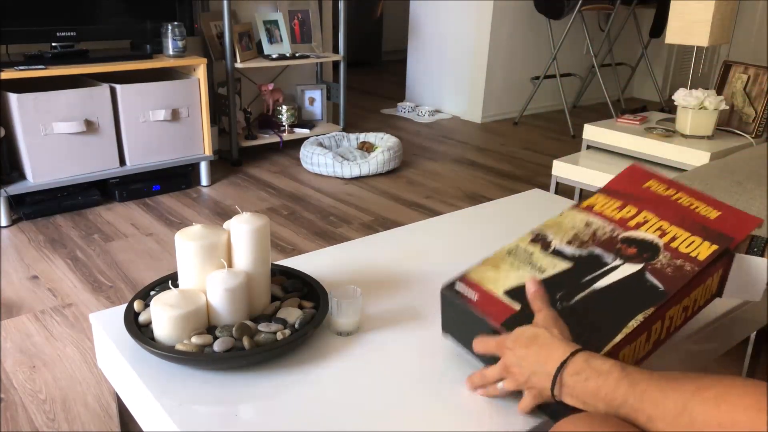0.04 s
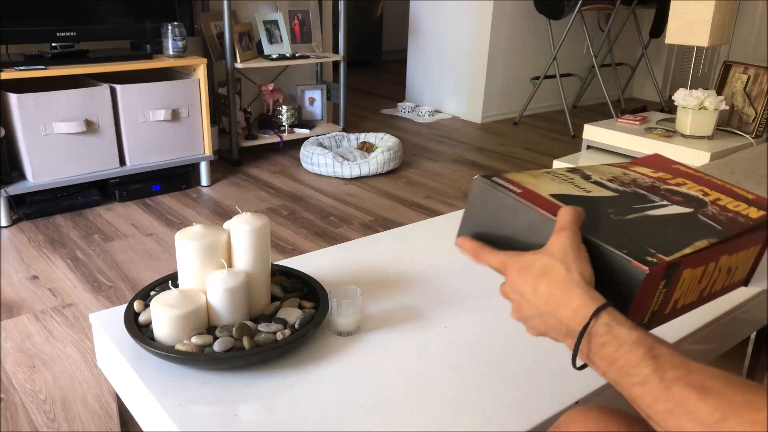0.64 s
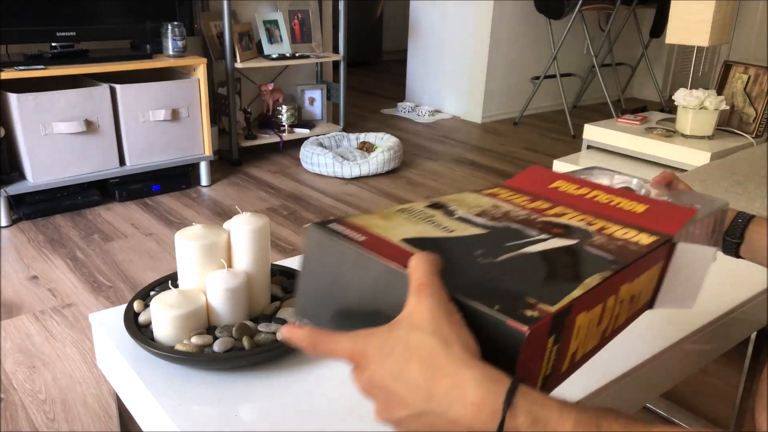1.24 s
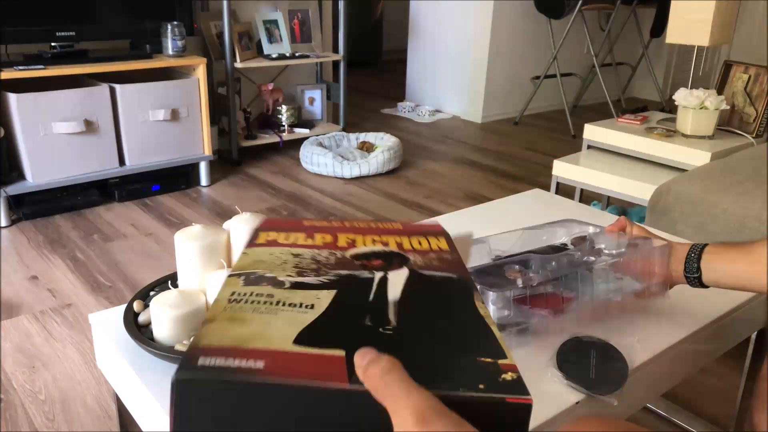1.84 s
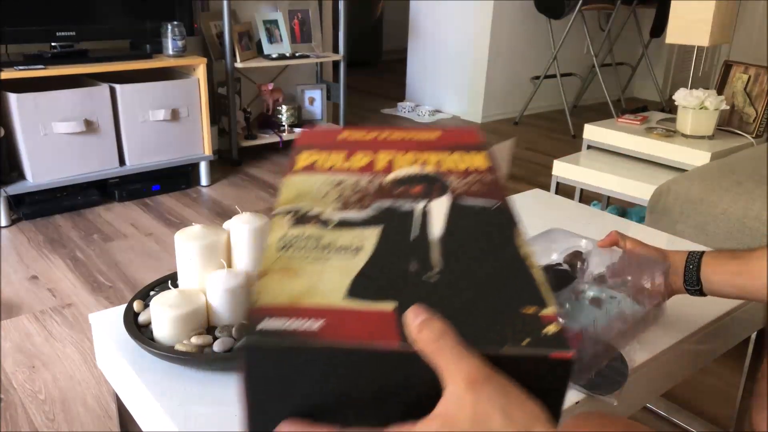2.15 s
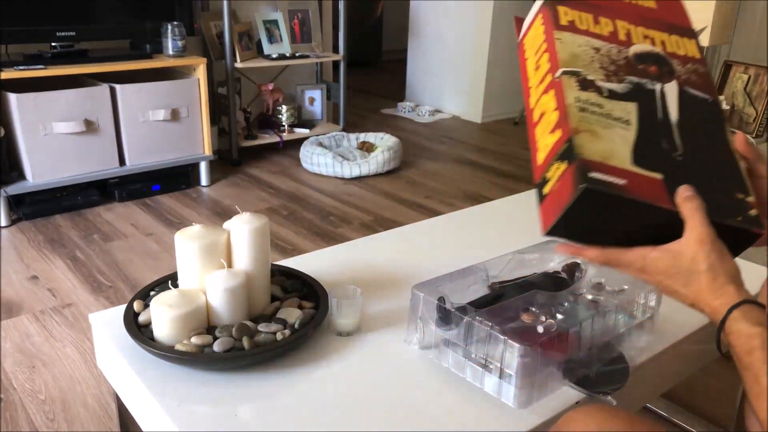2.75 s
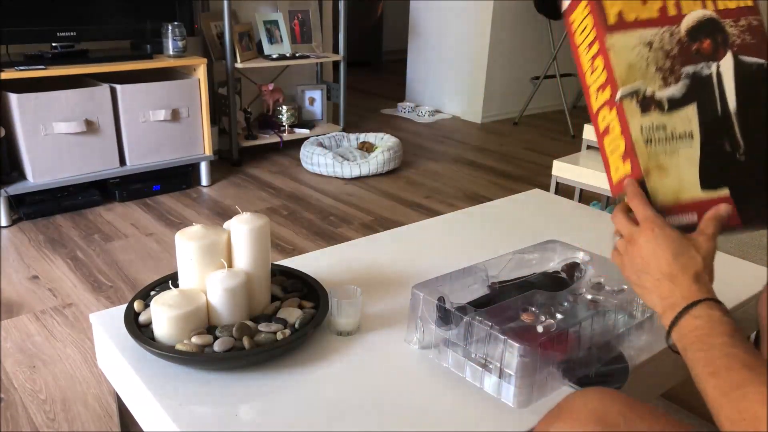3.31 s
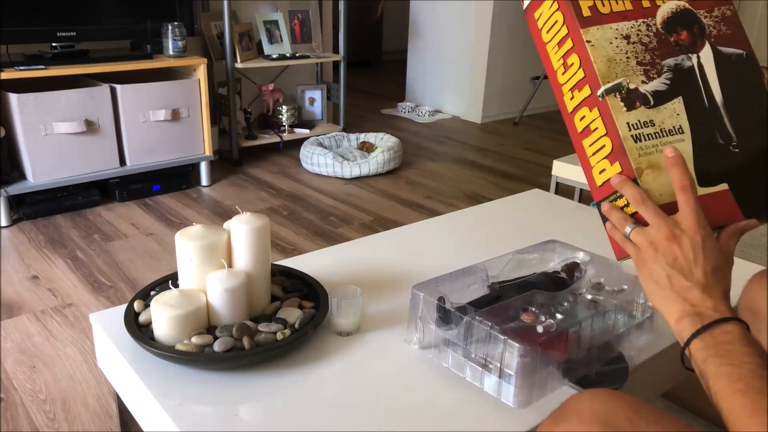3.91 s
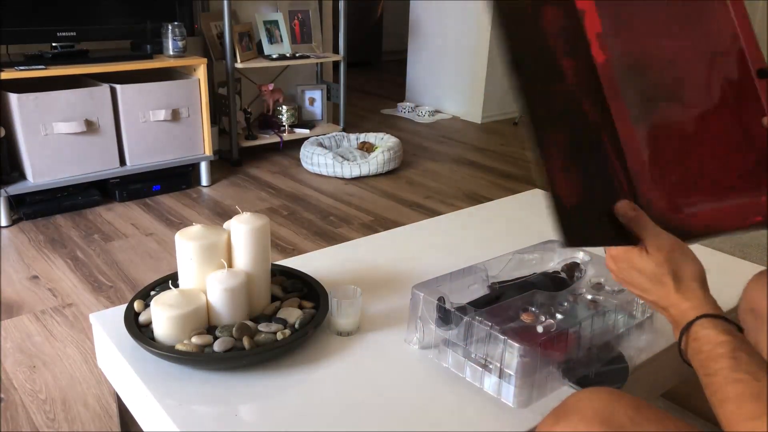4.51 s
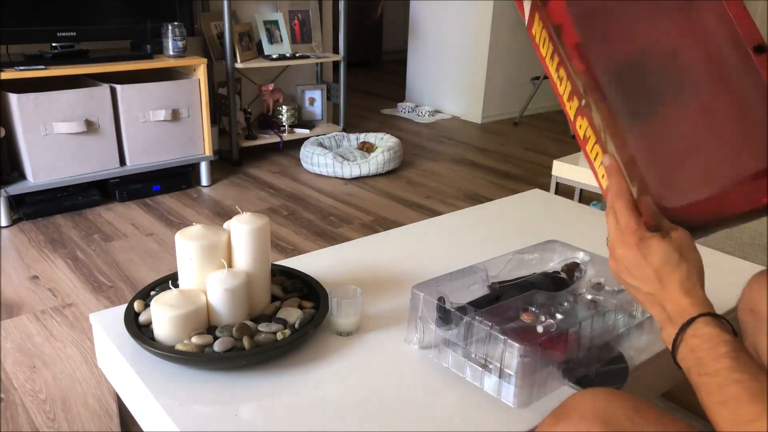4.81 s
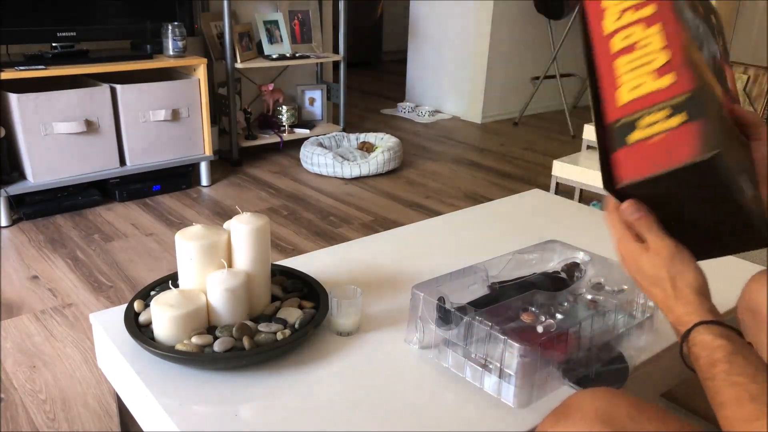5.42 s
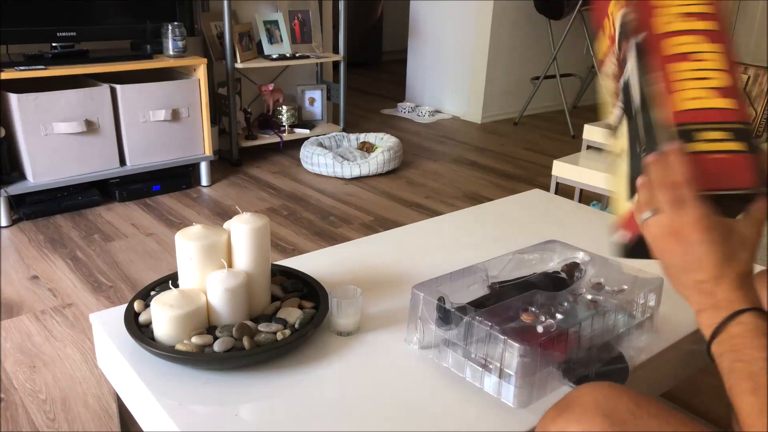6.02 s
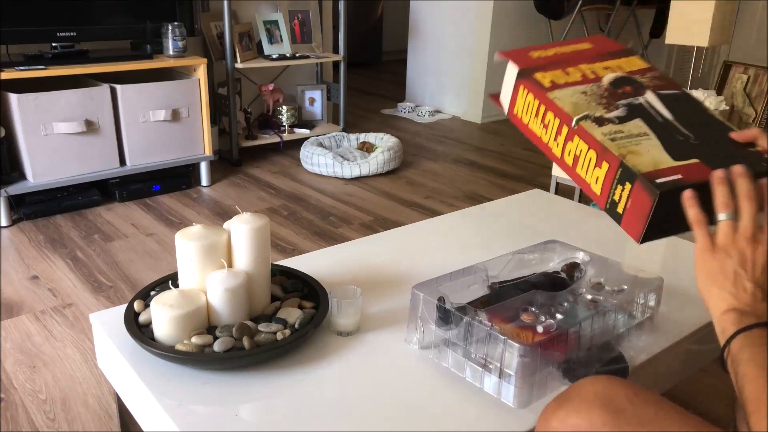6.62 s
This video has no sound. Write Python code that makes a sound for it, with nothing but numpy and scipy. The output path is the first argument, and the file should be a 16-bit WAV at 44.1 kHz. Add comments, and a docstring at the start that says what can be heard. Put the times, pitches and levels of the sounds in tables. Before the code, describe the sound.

Plastic slides and clacks against cardboard, a dropped plastic disc rattles, and a box flap pops open with sharp snaps in a quiet room.

```python
"""A living room: a plastic tray scrapes and clacks out of a cardboard box, and a hard plastic disc drops
out, rings and rocks on the table. The tray is set down, a flap snaps open in jerks, and hands turn
the box over, knocking and rubbing on it. Blows are made of fading tones (modes) and short bursts of
noise; rubbing is uneven noise. The room rings after every blow, and an appliance hums faintly."""
import sys
import numpy as np
from scipy import signal
from scipy.fft import rfft, irfft, next_fast_len
from scipy.io import wavfile
from scipy.ndimage import map_coordinates

SR = 44100
rng = np.random.default_rng(int(sys.argv[2]) if len(sys.argv) > 2 else 0)


def file_out(sig):
    """Save sig as 16-bit WAV at sys.argv[1]."""
    # one column per channel
    cols = np.atleast_2d(sig).T
    # limit, then scale
    lim = np.clip(cols, -1, 1)
    pcm = np.round(lim * 32767).astype(np.int16)
    wavfile.write(sys.argv[1], SR, pcm)


N = 293420

# Levels in all tables are relative. t60 is the time a sound takes to fade by 60 dB.
# low tones of the table's frame: f/Hz, level/dB, t60/s
FRAME_MODES = [(105.1, 2.5, 0.23), (130, -6, 0.32)]
# jerks of the flap's tab as it leaves its slot: t/s, level/dB
TAB_SNAPS = [(3.962, -36), (4.1177, -26.5), (4.1234, -24), (4.145, -20.5), (4.1532, -22.5), (4.1622, -19.5),
             (4.204, -19.5), (4.2077, -16), (4.2427, -31), (4.2559, -12.5), (4.264, -13.5), (4.2687, -15.5)]
# spectra, which say how strong a noise is from low to high: f/Hz, level/dB
CLACK_SPECTRUM = [(400, -22.5), (750, 0.5), (1100, 1.5), (1450, -2), (1900, 0), (3000, -11), (5000, -26),
                  (12000, -41)]  # a blow on a thin panel
CLICK_SPECTRUM = [(1200, -12.5), (2400, -5), (3300, 5.5), (4200, -5), (6000, -2.5), (8500, -8),
                  (11000, -14.5), (16000, -15.5)]  # hard plastic striking
CARD_SPECTRUM = [(700, -25.5), (1700, -9.5), (2400, 3), (3400, 0.5), (4200, -4), (5400, 1), (8000, -3.5),
                 (11000, -11), (16000, -25)]  # a sharp tick on cardboard
HOLLOW_SPECTRUM = [(90, -25.5), (210, -2), (245, -2), (285, -3), (350, -0.5), (435, 0), (540, -6.5),
                   (657, -2.5), (790, -10), (1400, -9), (3000, -34.5)]  # the hollow body of the box
SKIN_SPECTRUM = [(800, -16), (1800, 0), (3200, 1.5), (4200, -3), (6500, -2.5), (9000, -3.5), (12000, -10),
                 (16000, -9.5)]  # skin brushing over card


def disc():
    """The disc lands flat, then rocks on its rim; each contact rings the disc, the table and the room."""
    contacts = [(1.4662, -20), (1.5425, -26), (1.579, -17), (1.613, -28), (1.6445, -21.5), (1.658, -25),
                (1.717, -23.5), (1.766, -24)]  # the disc hits the table: t/s, click level/dB
    disc_modes = [(566, 0, .2), (867, -5, .35), (1058, 1, .2), (1091, 0, .2), (1111, -3, .2),
                  (1162, -4, .18), (1298, -3, .2), (1400, -2, .25), (1598, -4, .18), (1678, -2, .15),
                  (1755, -7, .28), (2008, -9, .16), (2276, -8, .22), (2341, -5, .22), (2369, -9, .18),
                  (2720, -10, .16), (2945, -11, .18), (3061, -10, .14), (3230, -11, .16), (3505, -9, .14),
                  (4430, -14, .1), (4963, -15, .1), (5927, -15, .1)]  # tones of the disc: f/Hz, level/dB, t60/s
    top_modes = [(506, 0, .17), (470, -10, .07), (385, -18, .06), (260, -16, .07), (175, -22, .08)]  # tones of the table top: f/Hz, level/dB, t60/s
    rattle_spectrum = [(40, -60.5), (100, -35), (200, -16.5), (400, -12), (520, -0.5), (720, -9),
                       (1100, -8), (1900, -7.5), (2400, -7), (3300, -14), (4200, -18), (6500, -22),
                       (16000, -34.5)]  # noise of a contact: f/Hz, level/dB
    settle_s, damping_db_per_s = 1.592, 196  # from then on the table muffles each contact more
    shake_db_per_s = 29  # the frame shakes more as the rocking gets lower
    landing_s = contacts[0][0]
    out = np.zeros(N)
    for s, click_db in contacts:
        ring_db = -22 - damping_db_per_s * max(s - settle_s, 0)
        top_db = -15 if s == landing_s else ring_db - 13
        frame_db = -52 + shake_db_per_s * (s - landing_s)
        contact = np.zeros(N)
        add(contact, s, amp(ring_db) * ring(disc_modes, scatter_db=2, attack=.00037))
        add(contact, s, amp(ring_db + 5.5) * burst(rattle_spectrum, t60=.06))
        add(contact, s, amp(click_db) * burst(CLICK_SPECTRUM, t60=.026))
        add(contact, s, amp(top_db) * ring(top_modes, scatter_db=1.2, attack=.0008))
        add(contact, s, amp(frame_db) * ring(FRAME_MODES, scatter_db=1.2, attack=.01))
        out += in_room(contact, wet_db=-.5)
    return out


def tray():
    """The thin tray clacks against the box; its last blow lands on the table and shakes the frame."""
    blows = [(0.965, -25.5, -56, -55), (0.973, -28.5, -29.5, -31.5), (0.98, -29, -45, -49),
             (1.072, -21.5, -49, -30.5), (2.126, -36, -53, -24.5), (2.456, -38, -41.5, -41.5),
             (2.509, -29, -28, -37.5)]  # the tray hits: t/s, clack level/dB, thud level/dB, click level/dB
    thud_spectrum = [(70, -28.5), (150, -14), (260, -4.5), (380, -6), (650, -7), (1100, -18), (3000, -43)]  # the dull part of a blow: f/Hz, level/dB
    flex_modes = [(300, -5, .05), (352, -1, .08), (386, 0, .1), (450, -5, .15), (1090, -9, .06)]  # the loaded tray bends as it lands: f/Hz, level/dB, t60/s
    out = np.zeros(N)
    for s, clack_db, thud_db, click_db in blows:
        add(out, s, amp(thud_db - 1.5) * burst(thud_spectrum, t60=.07, rise=.002))
        add(out, s, amp(clack_db - 3) * burst(CLACK_SPECTRUM, t60=.027, rise=.001))
        add(out, s, amp(click_db - 1.5) * burst(CLICK_SPECTRUM, t60=.028, rise=.0011))
    landing_s = blows[-1][0]
    add(out, landing_s, amp(-27.5) * ring(flex_modes, scatter_db=1, attack=.002))
    add(out, landing_s, amp(-38) * ring(FRAME_MODES, scatter_db=1, attack=.015))
    return out


def flap_snaps():
    """Each slip of the tab is a sharp snap; it shakes the panel more as the tab comes free."""
    free_s, loosening_db_per_s = TAB_SNAPS[-1][0], 60
    out = np.zeros(N)
    for s, snap_db in TAB_SNAPS:
        panel_db = -33.5 - loosening_db_per_s * (free_s - s)
        add(out, s, amp(snap_db - 3.5) * burst(CARD_SPECTRUM, t60=.008, rise=.0008))
        add(out, s, amp(panel_db) * burst(HOLLOW_SPECTRUM, t60=.034, rise=.00077))
    return out


def flap_boom():
    """With the last snap the flap springs free, jolts the box and booms through it."""
    boom_spectrum = [(90, -14), (200, 2.5), (480, -2.5), (600, 2.5), (1000, 3.5), (1900, -1.5), (2400, -2),
                     (3200, -10.5), (4200, -17), (7000, -38), (12000, -48.5)]  # the freed flap shaking: f/Hz, level/dB
    free_s = TAB_SNAPS[-1][0]
    out = np.zeros(N)
    add(out, free_s, amp(-25.5) * burst(HOLLOW_SPECTRUM, t60=.026, rise=.0008))
    add(out, free_s, amp(-28.5) * burst(boom_spectrum, t60=.31, rise=.016))
    return out


def box_knocks():
    """Each knock rings the box's tones nearest its pitch, taps the panel and ticks on the glossy card."""
    # knocks on the hollow box, from fingers and from the flap falling shut: t/s, level/dB, pitch/Hz
    knocks = [(0.087, -41.5, 640), (0.097, -34.5, 284), (0.594, -48, 250), (0.764, -43, 292),
              (0.773, -39, 263), (2.282, -41.5, 405), (2.916, -45, 670), (3.0, -49, 690),
              (3.091, -49.5, 660), (3.432, -35.5, 444), (3.451, -43, 420), (4.657, -46.5, 610),
              (5.19, -41, 456), (5.207, -39.5, 643), (5.303, -38.5, 440), (5.504, -46.5, 423),
              (5.586, -48.5, 418), (6.138, -46, 345), (6.255, -50, 640), (6.269, -42.5, 417)]
    box_modes = [(212.3, -8.5, 0.21), (266, 1, 0.068), (381, -1, 0.052), (430, -4, 0.081),
                 (649, -2.5, 0.073), (772, -12, 0.076), (1042, -5, 0.043), (1344, 2.5, 0.044)]  # tones of the hollow box: f/Hz, level/dB, t60/s
    panel_hz, tick_db_per_octave = 405, -6  # low, slack spots tick more
    out = np.zeros(N)
    for s, knock_db, pitch_hz in knocks:
        struck_modes = [(hz, db - 11 * np.log2(hz / pitch_hz) ** 2, t60) for hz, db, t60 in box_modes]
        tick_db = knock_db - 6.5 + tick_db_per_octave * np.log2(pitch_hz / panel_hz)
        add(out, s, amp(knock_db - 3) * ring(struck_modes, scatter_db=2, attack=.00088))
        add(out, s, amp(knock_db - 8.5) * burst(CLACK_SPECTRUM, t60=.03, rise=.0014))
        add(out, s, amp(tick_db) * burst(CARD_SPECTRUM, t60=.012))
    return out


def flap_clap():
    """The flap falls back flat against the box."""
    out = np.zeros(N)
    add(out, s=5.19, sound=amp(-41) * burst(CLACK_SPECTRUM, t60=.032, rise=.0039))
    return out


def tray_slide():
    """Plastic drags along the inside of the box: hiss and squeaks over a hollow drone."""
    pull = [(0.7, -78, -59.5), (0.79, -71.5, -47.5), (0.832, -58, -52.5), (0.944, -52.5, -49),
            (1.018, -54, -51), (1.198, -58.5, -57), (1.336, -58, -52.5), (1.47, -51.5, -53)]  # the tray slides out: t/s, hiss level/dB, drone level/dB
    scrape_spectrum = [(700, -12.5), (1700, 0), (3300, -1), (4200, -2), (6500, -3.5), (9000, -4),
                       (12000, -11.5), (16000, -10)]  # plastic rubbing on card: f/Hz, level/dB
    times, hiss_db, drone_db = np.transpose(pull)
    start, end = times[0], times[-1]
    t = np.arange(N) / SR
    moving = np.interp(t, [start - .02, start, end, end + .02], [0, 1, 1, 0])
    hiss_gain = amp(np.interp(t, times, hiss_db) + 3)
    drone_gain = amp(np.interp(t, times, drone_db) - 2)
    chirps = 1.6 * squeaks(start, end, pitch_hz=6600, length_s=.02, count=32)
    scrape = friction(scrape_spectrum, grain_db=2.5, grain_rate=700, judder_db=1)
    drone = friction(HOLLOW_SPECTRUM, grain_db=2.5, grain_rate=200, judder_db=1)
    return moving * (hiss_gain * (scrape + chirps) + drone_gain * drone)


def squeaks(start, end, pitch_hz, length_s, count):
    """Plastic sticks and slips on coated card, making tiny chirps at random times."""
    out = np.zeros(N)
    t = np.arange(round(length_s * SR)) / SR
    for when, height, glide, strength in rng.random((count, 4)):
        hz = pitch_hz * 2 ** (height - .5) * (1 + .06 * (glide - .5) * t / length_s)
        chirp = np.hanning(len(t)) * np.sin(2 * np.pi * np.cumsum(hz) / SR)
        add(out, start + when * (end - start), strength * chirp)
    return out


def fold_groans():
    """The flap's stiff fold rubs as it swings and sings through one narrow tone of the box."""
    groans = [(4.458, 0.15, 425, -49.5), (5.093, 0.037, 700, -46.5), (5.128, 0.036, 407, -44)]  # the fold rubs: t/s, length/s, pitch/Hz, level/dB
    out = np.zeros(N)
    for s, length, hz, db in groans:
        resonance = [(hz / 2, -26), (hz, 0), (hz * 2, -26), (hz * 8, -60)]
        add(out, s, amp(db) * swell(length, resonance))
    return out


def finger_swishes():
    """Fingertips whisk over the glossy card."""
    swishes = [(0.065, 0.038, -44), (0.427, 0.053, -59.5), (2.361, 0.045, -53), (2.774, 0.032, -64.5),
               (3.546, 0.13, -65), (4.86, 0.16, -67), (5.463, 0.092, -60), (6.053, 0.046, -65.5)]  # quick strokes: t/s, length/s, level/dB
    out = np.zeros(N)
    for s, length, db in swishes:
        add(out, s, amp(db) * swell(length, SKIN_SPECTRUM))
    return out


def palm_rubs():
    """Palms brush the card with each change of grip, and the rubbing makes the hollow box drone."""
    grips = [(0.1, 0.077, -59.5), (0.291, 0.041, -62.5), (0.48, 0.081, -65), (2.2, 0.06, -56.5),
             (2.43, 0.12, -60), (2.869, 0.075, -71.5), (3.6, .07, -84), (3.8, 0.054, -73),
             (4.08, 0.16, -71), (4.93, .08, -73), (5.22, 0.11, -69), (5.45, 0.13, -70), (6.1, 0.062, -71),
             (6.45, 0.34, -75)]  # a hand shifts: middle t/s, spread/s, level/dB
    t = np.arange(N) / SR
    grip_power = sum(amp(db) ** 2 * np.exp(-((t - s) / spread) ** 2) for s, spread, db in grips)
    creep_power = amp(-81.5) ** 2  # fingers creep even when they only hold the box
    rubbing = np.sqrt(creep_power + grip_power)
    brush = friction(SKIN_SPECTRUM, grain_db=4, grain_rate=500, judder_db=1.5)
    drone = friction(HOLLOW_SPECTRUM, grain_db=2.5, grain_rate=150, judder_db=1.5)
    return rubbing * (amp(1.5) * brush + amp(6) * drone)


def air_puffs():
    """The flap fans a low push of air as it opens and shuts."""
    puffs = [(4.251, .035, 0.65, -56), (5.1, .07, .1, -60)]  # swings of the flap: t/s, rise/s, t60/s, level/dB
    puff_spectrum = [(20, -11), (52, 2), (90, -9), (250, -52)]  # the pushed air: f/Hz, level/dB
    out = np.zeros(N)
    for s, rise, t60, db in puffs:
        add(out, s, amp(db) * burst(puff_spectrum, t60, rise))
    return out


def hum_and_air():
    """An appliance hums a little unsteadily over the soft noise of still air."""
    hum_tones = [(118.4, -62.5), (209.9, -74.5), (355.3, -77), (409.1, -80.5)]  # tones of the appliance: f/Hz, level/dB
    air_spectrum = [(25, -18.5), (55, -4.5), (80, -5.5), (125, -7.5), (166, -8), (363, -14), (560, -21),
                    (1040, -18), (1500, -29.5), (3400, -31.5), (4000, -34.5), (8400, -40), (16000, -53)]  # the quiet room: f/Hz, level/dB
    t = np.arange(N) / SR
    hum = np.zeros(N)
    for hz, db in hum_tones:
        peak = np.sqrt(2) * amp(db + .8 * wobble(1.2))
        hum += peak * np.sin(2 * np.pi * hz * t + .2 * wobble(6))
    return hum + amp(-62.5) * coloured(rng.standard_normal(N), air_spectrum, size=8192)


def reverb(x):
    """Echoes from the walls blur into a tail that builds up and fades; each call draws a new tail."""
    room_decay = [(100, 0.67), (500, 0.58), (2000, 0.6), (6000, 0.55), (10000, 0.45), (16000, 0.46)]  # how long the room rings: f/Hz, t60/s
    build_up_s = .0031
    hz, t, bands = signal.stft(rng.standard_normal(SR), SR, nperseg=256)
    fading_bands = bands * fade(t, along(room_decay, hz)[:, None])
    _, tail = signal.istft(fading_bands, SR, nperseg=256)
    tail *= 1 - np.exp(-np.arange(len(tail)) / SR / build_up_s)
    return signal.fftconvolve(x, tail / np.linalg.norm(tail))[:N]


def in_room(x, wet_db):
    """The direct sound plus the room's echoes at a gain of wet_db."""
    return x + amp(wet_db) * reverb(x)


def panel_in_room(source, wet_db):
    """A thin panel sends one mix of tones to the listener and another to the walls."""
    return source() + amp(wet_db) * reverb(source())


def ring(modes, scatter_db, attack):
    """A struck object's fading tones; their strengths vary, as each blow lands on a new spot."""
    t = np.arange(SR * 3 // 4) / SR
    hz, db, t60 = np.transpose(modes)[:, :, None]
    gain = amp(db + scatter_db * rng.standard_normal(hz.shape))
    waves = np.sin(2 * np.pi * (hz * t + rng.random(hz.shape))) * fade(t, t60)
    onset = 1 - np.exp(-t / attack)
    return np.sqrt(2) * (gain * waves).sum(0) / np.linalg.norm(gain) * onset


def burst(spectrum, t60, rise=.0002):
    """Noise that rises and dies away, like the many crowded tones of a struck, damped panel."""
    t = np.arange(SR // 2) / SR
    shape = np.minimum(t / rise, 1) * fade(np.maximum(t - rise, 0), t60)
    noise = unit(rng.standard_normal(len(t)) * shape)
    return coloured(noise, spectrum) * np.sqrt(np.mean(shape ** 2))


def friction(spectrum, grain_db, grain_rate, judder_db):
    """Rubbing: tiny catches of uneven size (grain) under a wavering pressure (judder)."""
    catches = rng.standard_normal(N) * amp(grain_db * wobble(grain_rate) + judder_db * wobble(25))
    return coloured(unit(catches), spectrum)


def swell(length_s, spectrum):
    """A short rub that comes and goes smoothly."""
    shape = np.hanning(round(length_s * SR))
    noise = coloured(rng.standard_normal(SR // 2), spectrum)
    return unit(noise[-len(shape):]) * shape


def coloured(x, spectrum, size=2048):
    """Filter x with this spectrum, keeping its energy."""
    gains = amp(along(spectrum, np.fft.rfftfreq(size, 1 / SR)))
    cepstrum = irfft(np.log(gains))
    # fold the second half onto the first, so the filter never rings before it is struck
    cepstrum[1:size // 2] *= 2
    cepstrum[size // 2 + 1:] = 0
    response = irfft(np.exp(rfft(cepstrum)))
    filtered = signal.fftconvolve(x, response)[:len(x)]
    return unit(filtered) * np.sqrt(np.mean(x ** 2))


def wobble(rate):
    """A smooth curve through `rate` random points a second."""
    points = rng.standard_normal(int(N * rate / SR) + 4)
    return map_coordinates(points, [np.arange(N) * rate / SR])


def fade(t, t60):
    """A gain that falls by 60 dB every t60 seconds."""
    return np.exp(-np.log(1000) * t / t60)


def along(points, hz):
    """Read between rows of f/Hz, value on a logarithmic frequency scale."""
    freqs, values = np.transpose(points)
    return np.interp(np.log(hz + 1), np.log(freqs + 1), values)


def amp(db):
    """Turn decibels into a gain."""
    return 10 ** (np.asarray(db) / 20)


def unit(x):
    """Scale x to an average power of 1."""
    return x / np.sqrt(np.mean(x ** 2) + 1e-20)


def add(track, s, sound):
    """Mix a sound into the track, starting at s seconds."""
    start = max(0, round(s * SR))
    track[start:start + len(sound)] += sound[:N - start]


def scene():
    """Mix the sources into one channel; blows and rubs each get their share of the room's echoes."""
    blows = disc() + panel_in_room(tray, wet_db=-2) + in_room(box_knocks() + flap_clap(), wet_db=-.5)
    rubs = tray_slide() + palm_rubs() + finger_swishes() + fold_groans()
    cardboard = panel_in_room(flap_snaps, wet_db=-5) + in_room(flap_boom() + rubs, wet_db=-4.5)
    return (blows + cardboard + air_puffs() + hum_and_air())[None]


def record(dry):
    """A steep filter cuts off the very highest treble."""
    cutoff_hz = 16100
    size = next_fast_len(N + SR // 2)
    hz = np.fft.rfftfreq(size, 1 / SR)
    lowpass = 1 / (1 + (hz / cutoff_hz) ** 120)
    return irfft(rfft(dry, size) * lowpass, size)[:, :N]


dry = scene()
out = record(dry)
file_out(out)
```